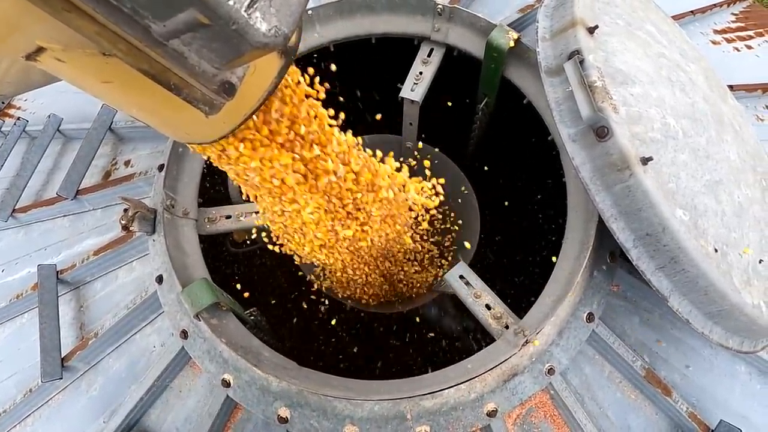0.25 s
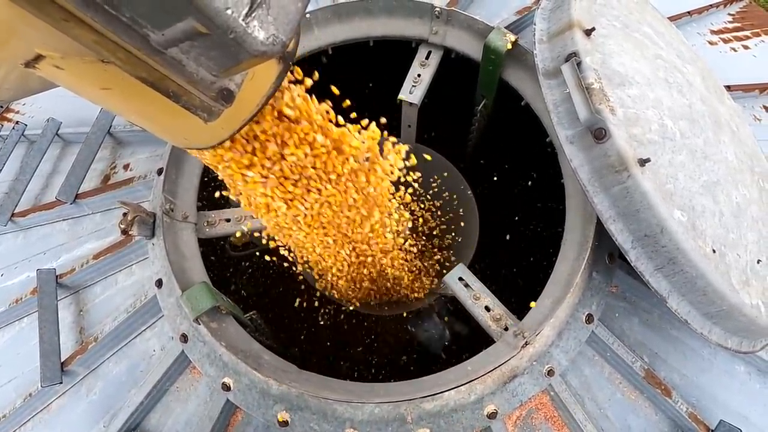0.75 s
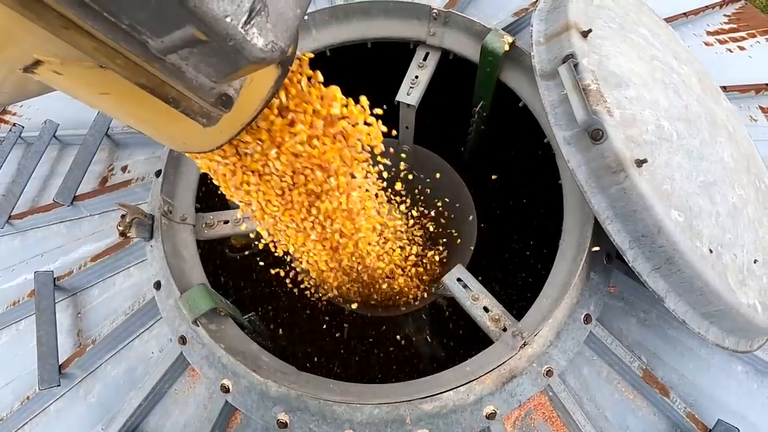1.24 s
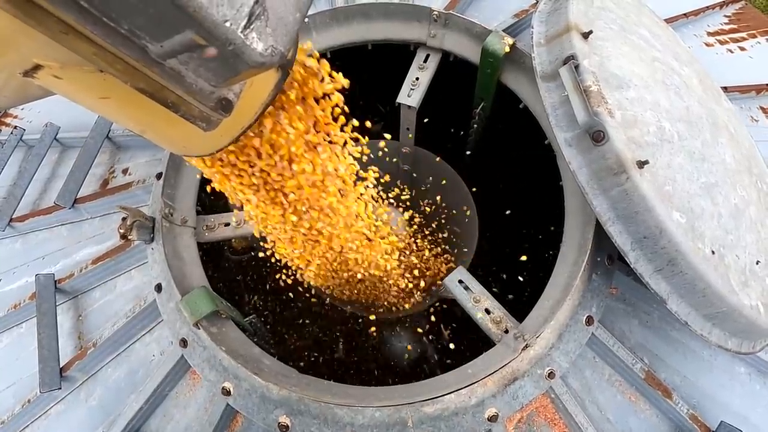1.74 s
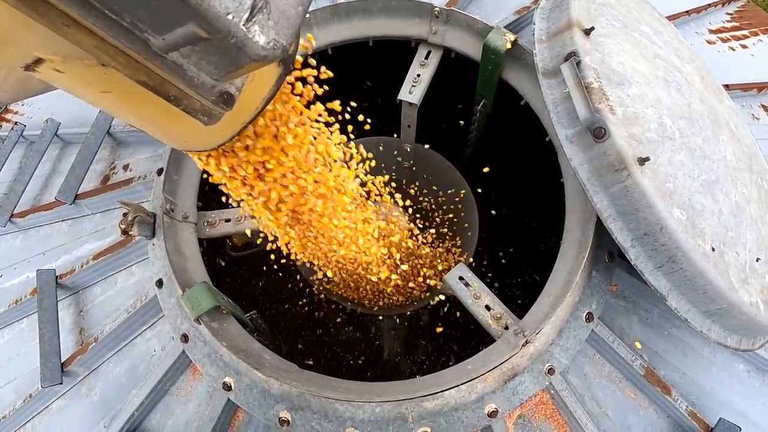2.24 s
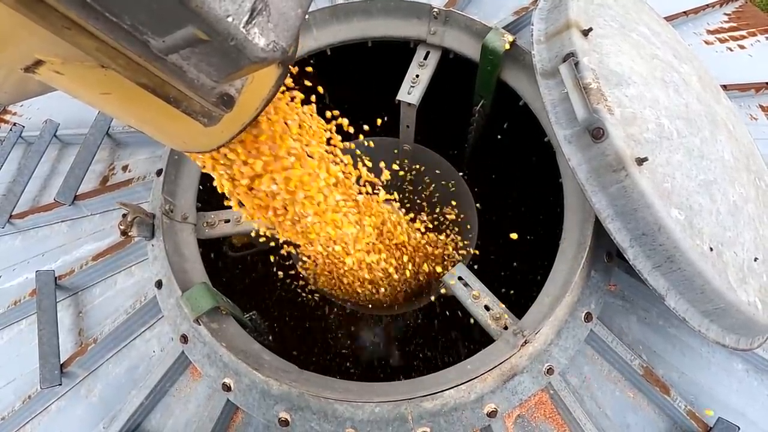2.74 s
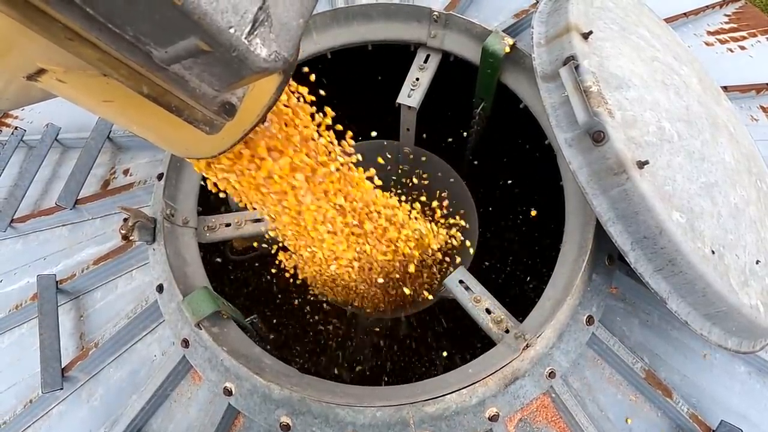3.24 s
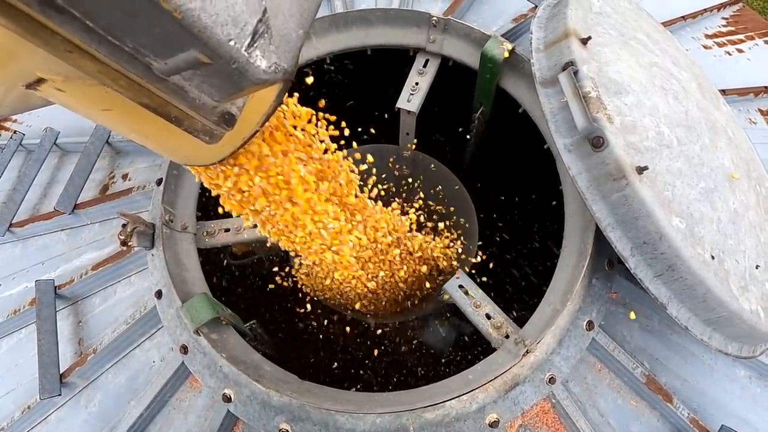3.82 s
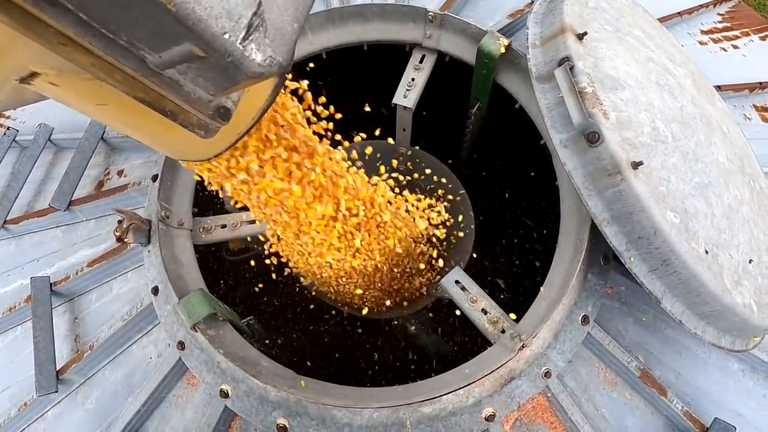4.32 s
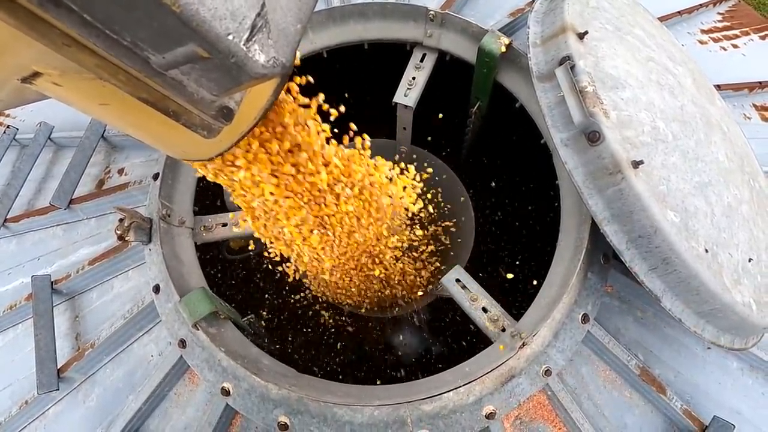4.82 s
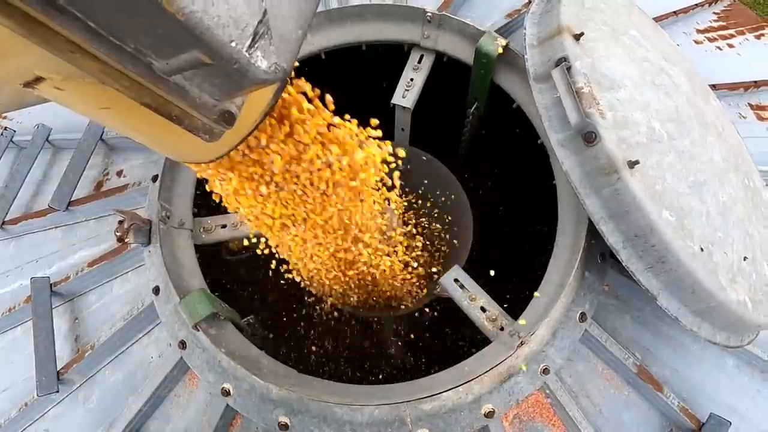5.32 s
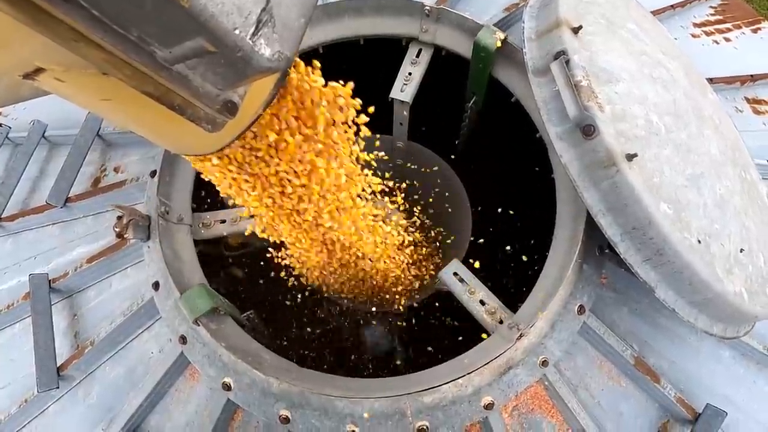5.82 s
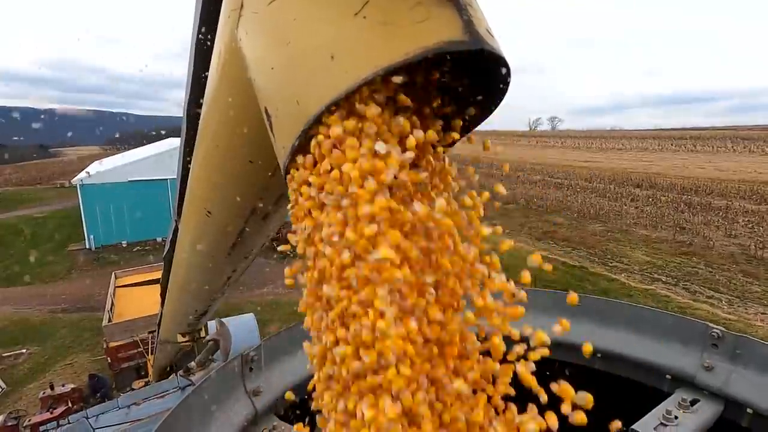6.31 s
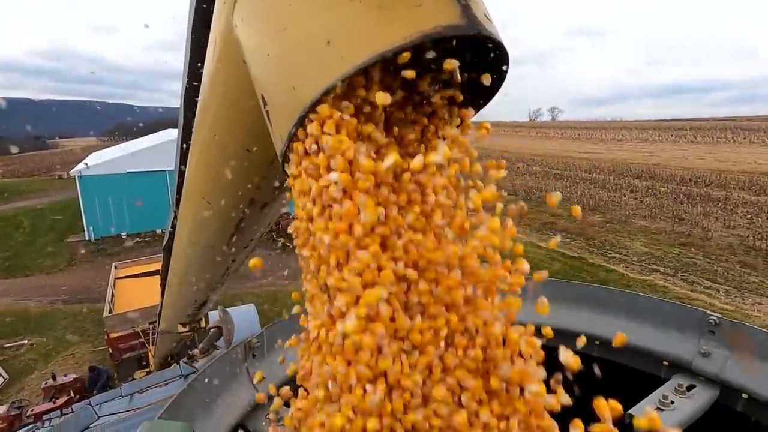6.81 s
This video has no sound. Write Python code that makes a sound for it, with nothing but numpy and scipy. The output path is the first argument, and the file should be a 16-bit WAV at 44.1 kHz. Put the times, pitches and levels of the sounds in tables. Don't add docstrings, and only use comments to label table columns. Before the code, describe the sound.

Dense, loud, steady hiss of dry corn kernels pouring onto metal inside a grain bin, shifting slightly in tone near the end.

```python
import sys
import numpy as np
from scipy import signal
from scipy.fft import rfft, irfft, next_fast_len
from scipy.io import wavfile
from scipy.ndimage import uniform_filter1d, minimum_filter1d

SR = 44100
rng = np.random.default_rng(int(sys.argv[2]) if len(sys.argv) > 2 else 0)


def transcribe(u):
    v = np.clip(np.atleast_2d(u).T, -1, 1)
    q = np.round(v * 32767).astype(np.int16)
    wavfile.write(sys.argv[1], SR, q)


def field_ratio(decibels):
    return 10 ** (np.asarray(decibels, dtype=float) / 20)


N = 311346

# frequency_hz [Hz], density_db [dB per Hz]
HATCH_SPECTRUM = [(210, -54), (350, -24), (429, -22.5), (1070, -17), (1210, -13.5), (1430, -15),
                  (1590, -10), (1820, -12), (3000, -5.5), (3480, -4), (4140, -1), (5430, -4.5), (7210, -12),
                  (8830, -25.5), (11500, -56), (19400, -120)]
# frequency_hz [Hz], density_db [dB per Hz]
SPOUT_SPECTRUM = [(210, -53), (350, -23), (483, -29.5), (510, -23), (624, -20), (816, -22), (1110, -18),
                  (1270, -18.5), (1600, -14), (3780, -2), (4560, -5), (6130, -6.5), (8700, -21.5),
                  (11300, -62), (19100, -120)]
# frequency_hz [Hz], density_db [dB per Hz]
CHAFF_SPECTRUM = [(5380, -35), (9150, -14), (9610, -4), (11000, -0.5), (11500, -4.5), (12100, -13.5),
                  (13000, -12.5), (13700, -26)]
# frequency_hz [Hz], density_db [dB per Hz]
BIN_SPECTRUM = [(12, -62), (20, -30), (59, -29), (85, -15.5), (119, -13), (162, -9.5), (196, -0.5),
                (214, 2), (290, -0.5), (347, -11.5), (420, -20), (550, -54), (920, -120)]
# mode_hz [Hz], width_hz [Hz], hump_db [dB over the ticks]
PLATE_MODES = [(417, 70, -1.5), (590, 46, 2.5), (745, 55, 2), (816, 30, -2), (880, 45, 1.5), (1220, 60, 3),
               (1580, 55, 2), (2055, 38, 2), (2280, 41, 4), (2510, 40, 3.5), (2714, 45, 3), (3040, 80, 4),
               (3760, 53, 4.5), (4123, 86, 4.5), (4280, 41, 3.5), (4405, 45, -2), (4600, 38, 4.5),
               (5310, 85, 6), (5680, 65, 3.5), (6130, 55, 6.5), (7073, 70, 4.5), (7460, 90, 3.5),
               (8540, 43, -1)]
# mode_hz [Hz], width_hz [Hz], hump_db [dB over the ticks]
SPOUT_MODES = [(874, 31, 5.5), (1205, 45, 5.5), (1575, 60, 3.5), (2363, 50, 1.5), (2540, 35, 5),
               (2740, 51, 6), (3210, 60, 5), (3810, 120, 4), (4120, 90, 5), (5320, 120, 3.5), (5400, 60, 2)]
# pitch_hz [Hz], level_db [dB rms]
ENGINE_ORDERS = [(47.3, -70), (94.9, -62), (142, -59), (476.4, -56)]
# start_s [s], treble_end_s [s], bass_end_s [s]
SIDE_SPELLS = [
    (1.22, 1.4, 1.45),
    (1.9, 2.14, 2.5),
    (3.24, 3.45, 3.6),
    (4.75, 5.0, 5.37),
    (6.95, 7.06, 7.06),
]

T = np.arange(N) / SR
FFT_SIZE = next_fast_len(N)
HZ = np.maximum(np.fft.rfftfreq(FFT_SIZE, 1 / SR), 1)
SCENE_CHANGE_S = 5.947
FLOW_DB, FLOW_RISE_DB_PER_S = -12.5, 0.0941
CHAFF_DB, CHAFF_FALL_DB_PER_S, CHAFF_BEHIND_DB = -16.5, 0.21, -1
BOOM_DB, BOOM_SWELL_DB, BOOM_SWELLS_PER_S = -36, 0.4, 12
AUGER_HZ, AUGER_CREST_S, BOOM_LAG_S = 7.45, .0164, .092
FLOW_SURGE_DB, CHAFF_SURGE_DB, BOOM_SURGE_DB = .22, .1, .8
CEILING = .92
NOTCH_HZ, NOTCH_WIDTH_HZ, LOW_CUT_HZ = 9005, 150, 45
WIDE_TOP_HZ, TIGHT_TOP_HZ = 13660, 13420
BUMP_DB, BUMP_S = -40, .0013


def set_rms(x, level_db):
    return x * field_ratio(level_db) / np.sqrt(np.mean(x ** 2))


def colour(x, points, modes=()):
    point_hz, point_db = np.transpose(points)
    gain_db = np.interp(np.log(HZ), np.log(point_hz), point_db, left=-200, right=-200)
    for mode_hz, width_hz, hump_db in modes:
        gain_db = gain_db + hump_db / (1 + (2 * (HZ - mode_hz) / width_hz) ** 2)
    spectrum = rfft(x, FFT_SIZE) * field_ratio(gain_db)
    return set_rms(irfft(spectrum, FFT_SIZE)[:N], 0)


def walk(rate_hz):
    hold = int(SR / rate_hz)
    steps = np.repeat(rng.standard_normal(N // hold + 1), hold)
    return 1.24 * uniform_filter1d(uniform_filter1d(steps, hold), hold)[:N]


def ticks(scatter_db, clump_db, clump_rate_hz):
    size_db = scatter_db * rng.exponential(size=N) + clump_db * walk(clump_rate_hz)
    return field_ratio(size_db) * rng.standard_normal(N)


def kernel_stream():
    hits = ticks(scatter_db=1.5, clump_db=.45, clump_rate_hz=9)
    at_hatch = colour(hits, HATCH_SPECTRUM, PLATE_MODES)
    behind_spout = colour(hits, SPOUT_SPECTRUM, SPOUT_MODES)
    return np.where(T < SCENE_CHANGE_S, at_hatch, behind_spout)


def chaff():
    return colour(ticks(scatter_db=1.6, clump_db=.75, clump_rate_hz=45), CHAFF_SPECTRUM)


def bin_boom():
    return colour(ticks(scatter_db=2.0, clump_db=0.0, clump_rate_hz=8.8), BIN_SPECTRUM)


def tractor():
    turns = np.cumsum(1 + 0.00208 * walk(1.5)) / SR
    hum = 0
    for pitch_hz, level_db in ENGINE_ORDERS:
        peak = np.sqrt(2) * field_ratio(level_db + 1.5 * walk(3.2))
        hum = hum + peak * np.sin(2 * np.pi * (pitch_hz * turns + rng.random()))
    return hum


def side_noise():
    def spell(end_column):
        inside = sum((T > row[0]) & (T < row[end_column]) for row in SIDE_SPELLS)
        return uniform_filter1d(inside * 1., size=800)

    top = colour(rng.standard_normal(N), [(11020, -1.5), (11800, 0), (12900, -4), (13650, -16)])
    bass = colour(rng.standard_normal(N), [(30, -20), (250, 0), (500, -5), (1150, -4)])
    treble_spell, bass_spell = spell(1), spell(2)
    threshold = np.where(treble_spell > 0, -.2, 1.3)
    treble = 0
    for low_hz in np.arange(1200, 11000, 700):
        patch = uniform_filter1d((walk(30) > threshold) * 1., size=800)
        band_db = np.interp(low_hz, [1200, 2700, 4000, 7000, 8900, 10300], [-6, -6, 0.0, -2, -7, -3])
        band = colour(rng.standard_normal(N), [(low_hz, 0), (low_hz + 700, 0)])
        treble = treble + field_ratio(band_db) * patch * band
    steady = field_ratio(-46.0) * top * field_ratio(1.5 * walk(20))
    return steady + field_ratio(-47.5) * bass_spell * treble + field_ratio(-52) * bass_spell * bass


def auger_surge(lag_s):
    return np.cos(2 * np.pi * AUGER_HZ * (T - AUGER_CREST_S - lag_s))


def scene():
    surge = auger_surge(0)
    flow_db = FLOW_DB + FLOW_RISE_DB_PER_S * T + FLOW_SURGE_DB * surge
    chaff_db = CHAFF_DB - CHAFF_FALL_DB_PER_S * T + CHAFF_BEHIND_DB * (T > SCENE_CHANGE_S)
    chaff_db = chaff_db + CHAFF_SURGE_DB * surge
    boom_db = BOOM_DB + BOOM_SURGE_DB * auger_surge(BOOM_LAG_S) + BOOM_SWELL_DB * walk(BOOM_SWELLS_PER_S)
    grain = field_ratio(flow_db) * kernel_stream() + field_ratio(flow_db + chaff_db) * chaff()
    mono = grain + field_ratio(boom_db) * bin_boom() + tractor()
    return np.tile(mono, (2, 1))


def roll_off(x):
    return signal.sosfilt(signal.butter(12, 14140, fs=SR, output="sos"), x)


def record(dry):
    headroom = minimum_filter1d(np.minimum(1, CEILING / (np.abs(dry) + 1e-9)), size=89)
    x = dry * uniform_filter1d(headroom, size=45)
    x = signal.sosfilt(signal.butter(1, LOW_CUT_HZ, "high", fs=SR, output="sos"), x)
    x = x - field_ratio(BUMP_DB) * np.exp(-.5 * ((T - SCENE_CHANGE_S) / BUMP_S) ** 2)
    b, a = signal.iirnotch(NOTCH_HZ, NOTCH_HZ / NOTCH_WIDTH_HZ, SR)
    x = signal.lfilter(b, a, signal.lfilter(b, a, x))
    x = x + side_noise() * np.array([[1], [-1]])
    wide = signal.sosfiltfilt(signal.ellip(8, .2, 45, WIDE_TOP_HZ, fs=SR, output="sos"), x)
    tight = signal.sosfiltfilt(signal.ellip(8, .2, 45, TIGHT_TOP_HZ, fs=SR, output="sos"), x)
    flicker = uniform_filter1d((walk(25) > 0) * 1., size=400)
    mix = tight + (wide - tight) * flicker
    return roll_off(mix)


dry = scene()
out = record(dry)
transcribe(out)
```